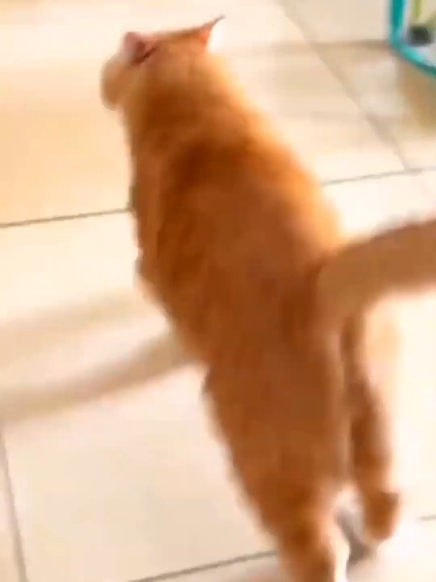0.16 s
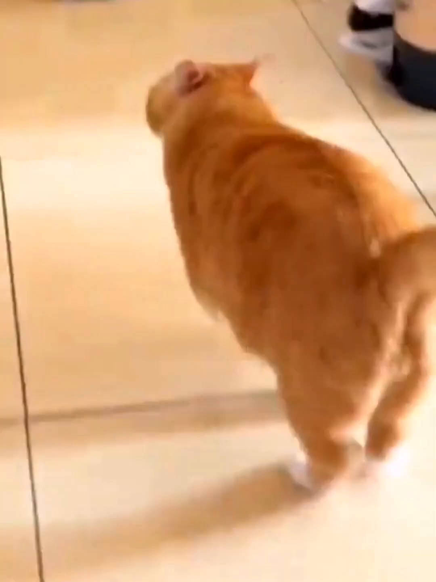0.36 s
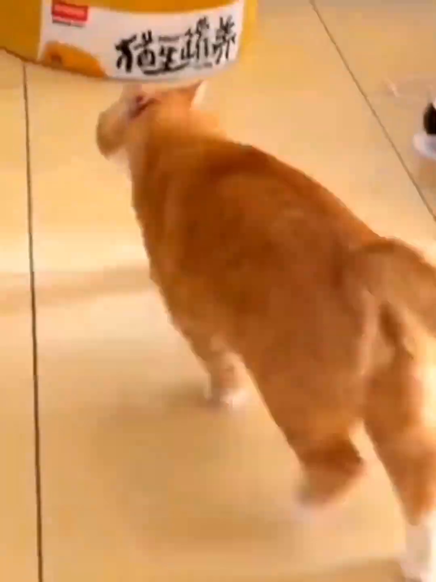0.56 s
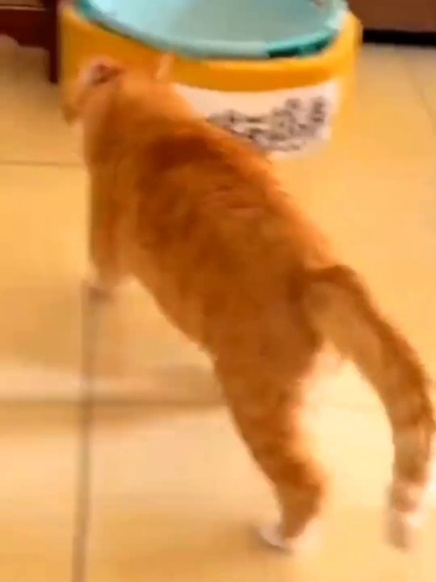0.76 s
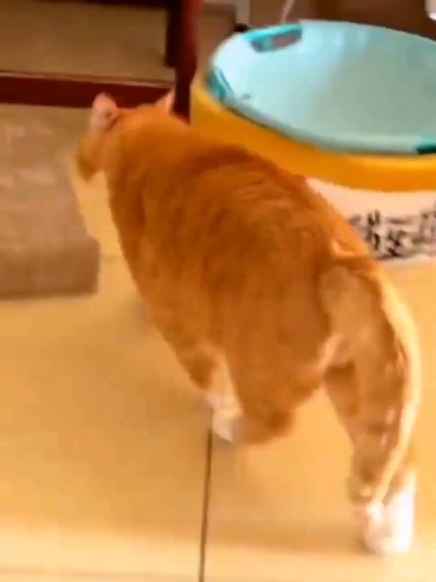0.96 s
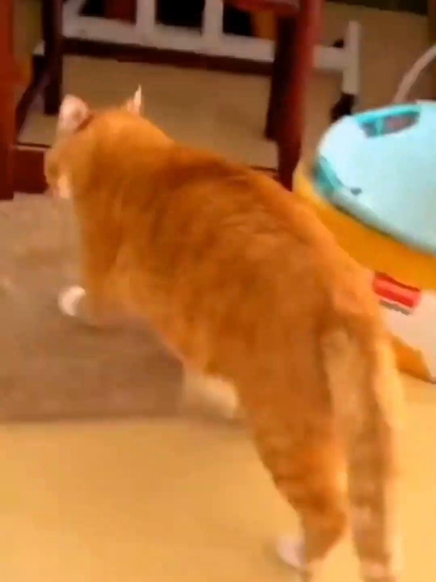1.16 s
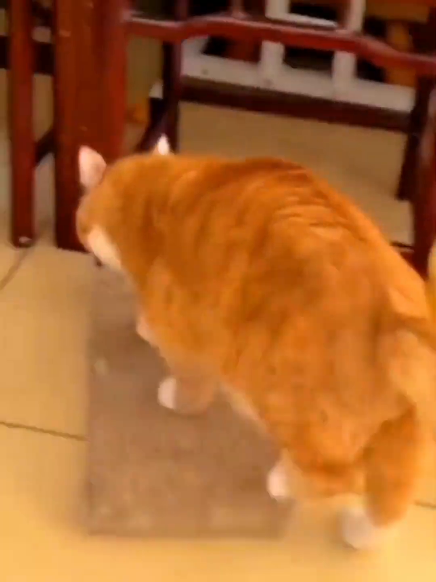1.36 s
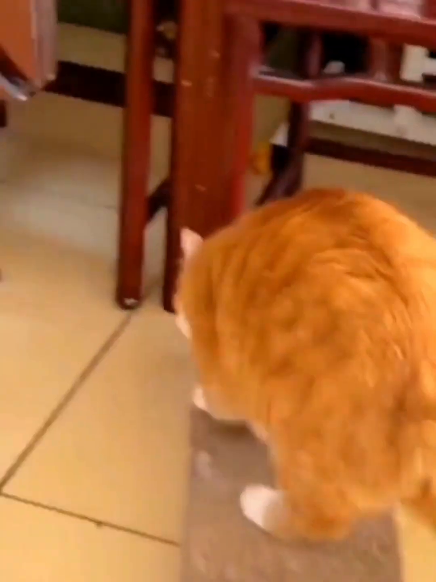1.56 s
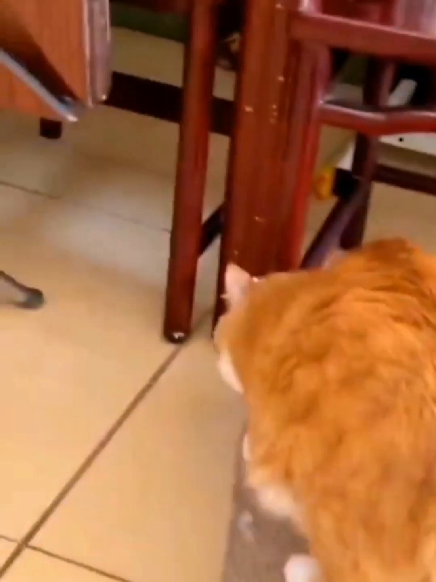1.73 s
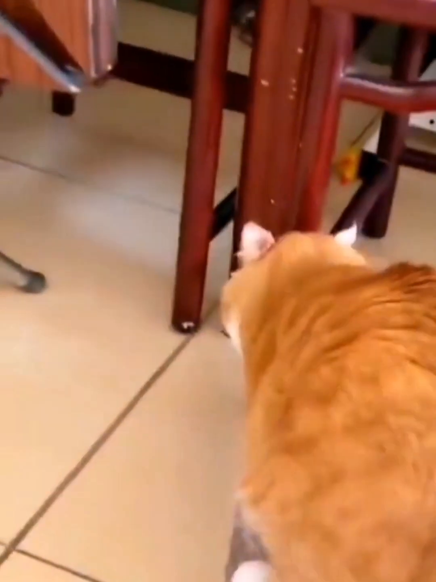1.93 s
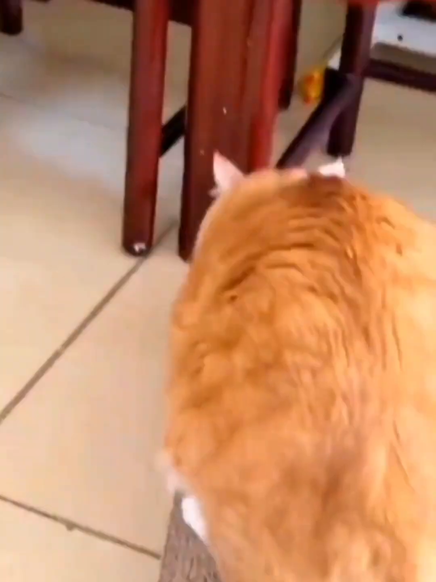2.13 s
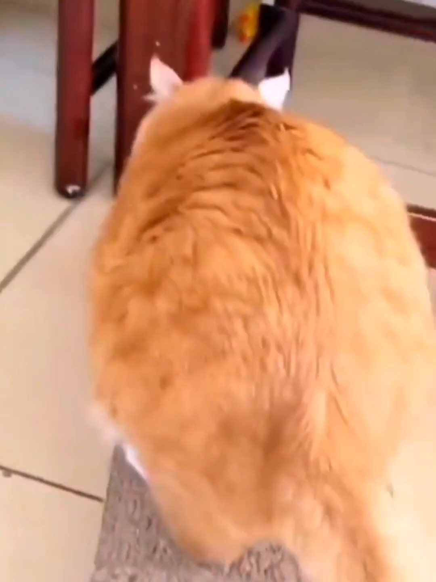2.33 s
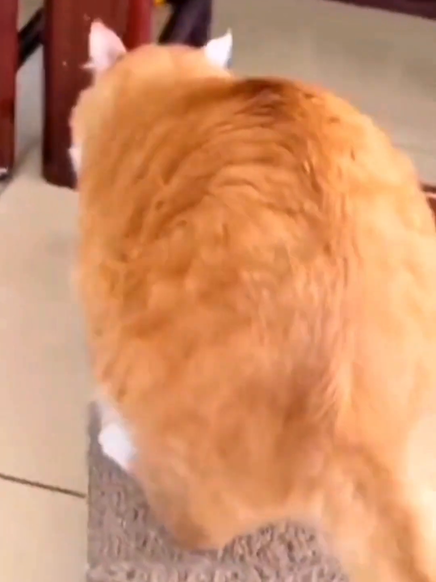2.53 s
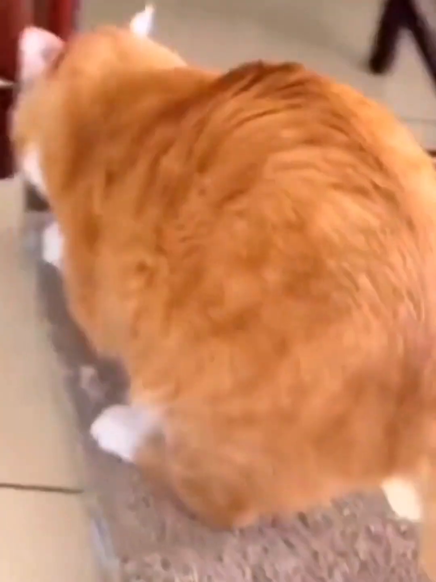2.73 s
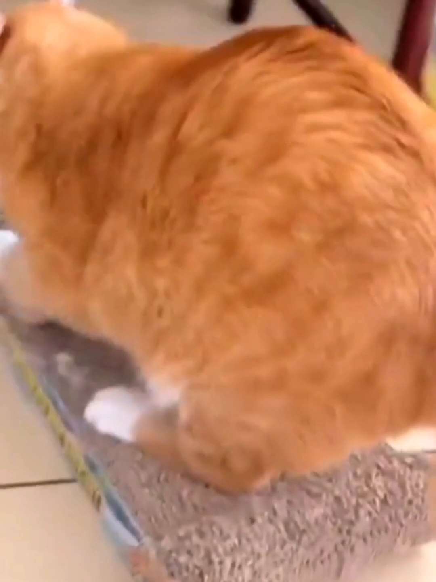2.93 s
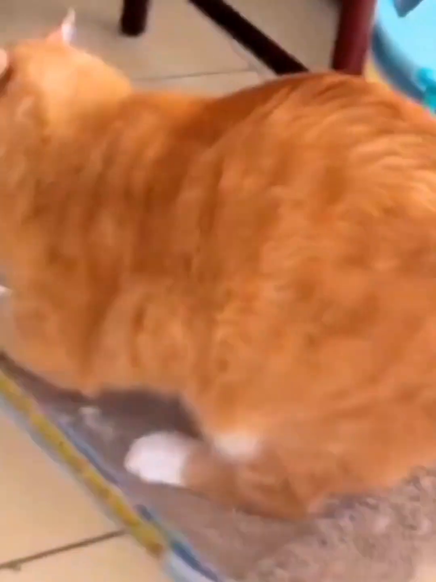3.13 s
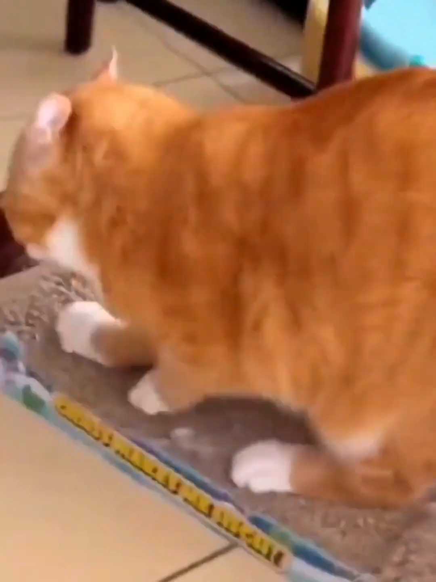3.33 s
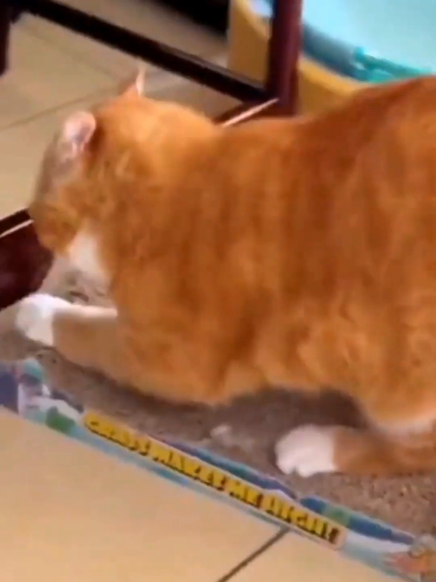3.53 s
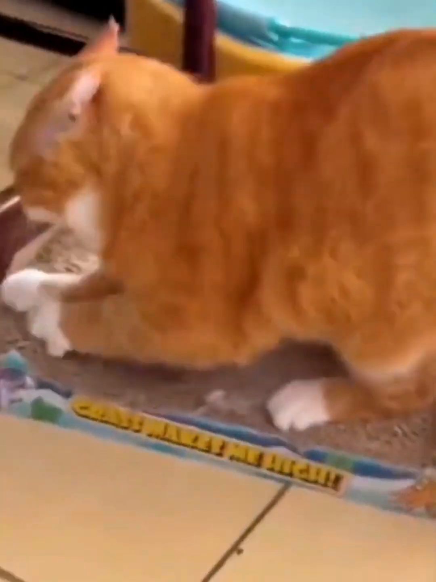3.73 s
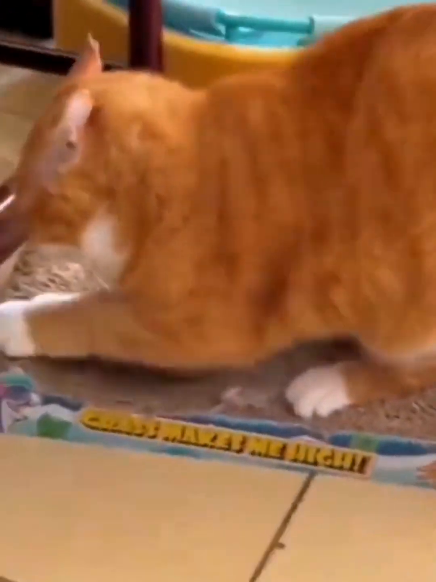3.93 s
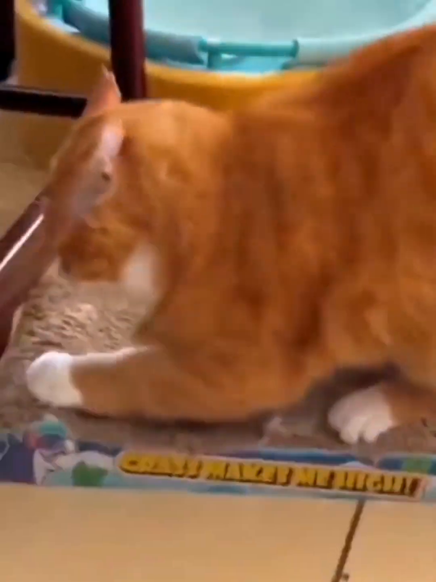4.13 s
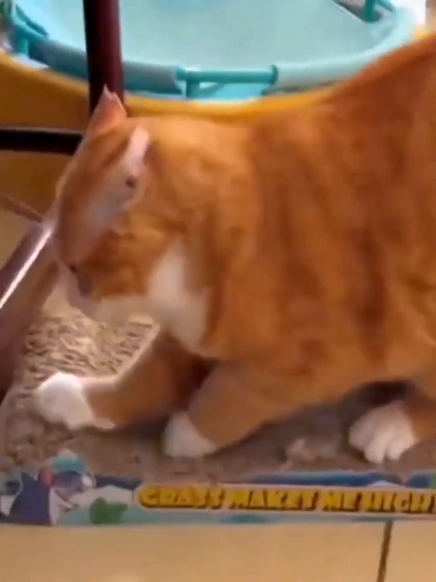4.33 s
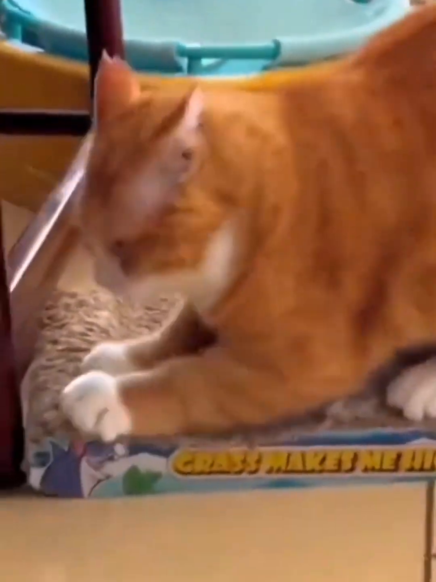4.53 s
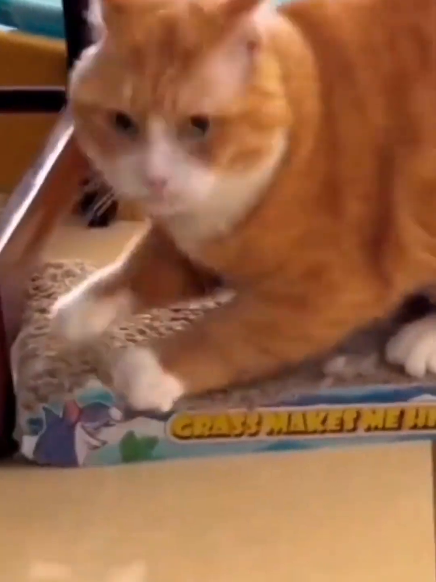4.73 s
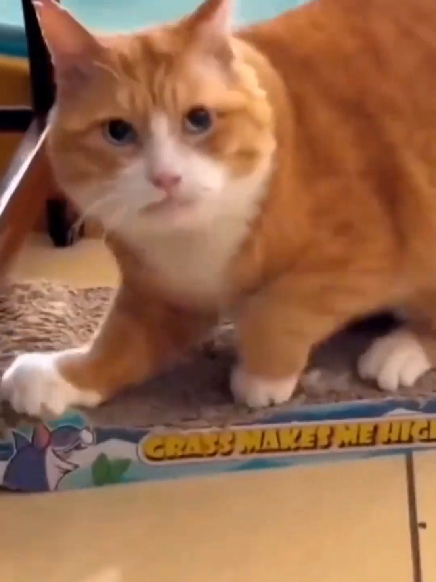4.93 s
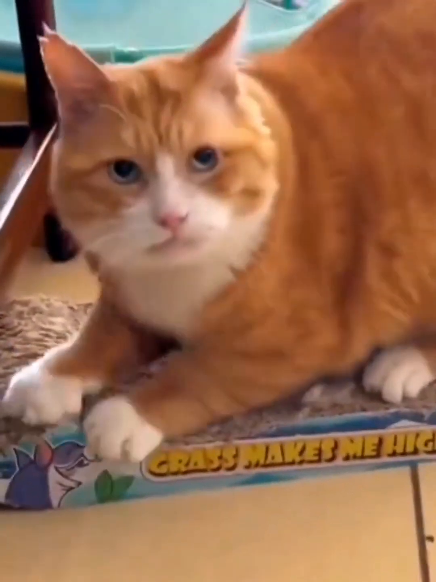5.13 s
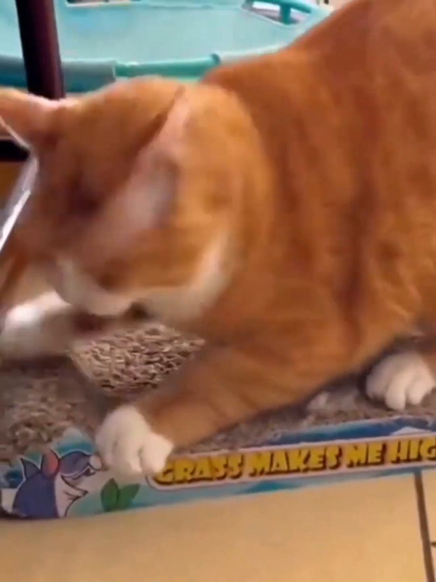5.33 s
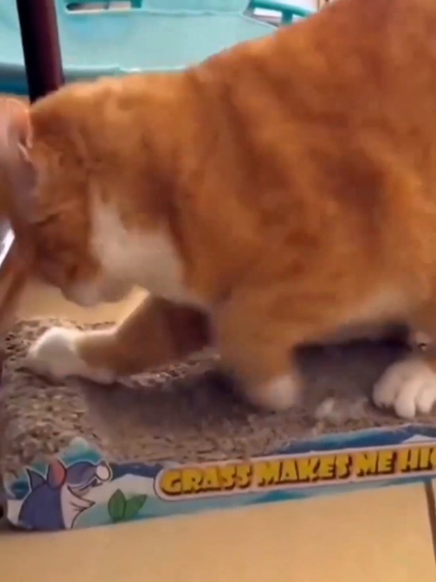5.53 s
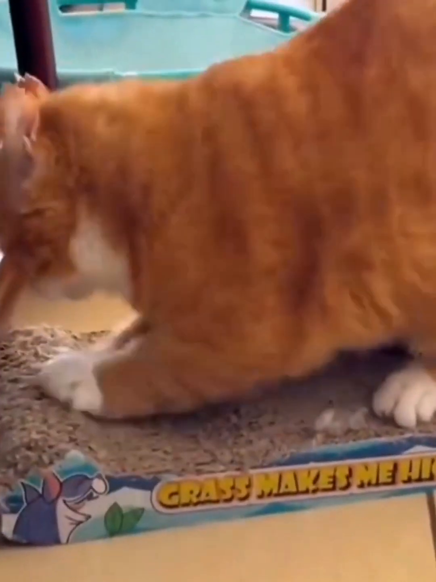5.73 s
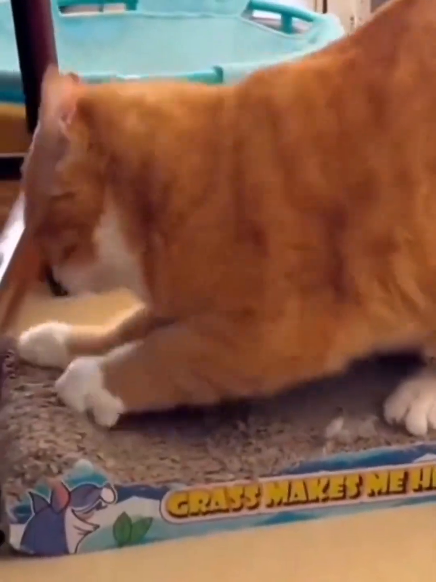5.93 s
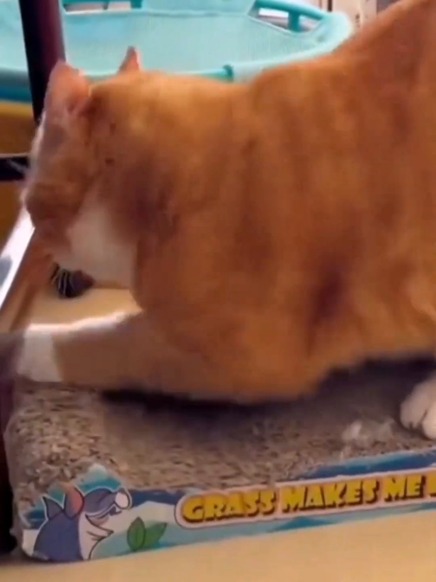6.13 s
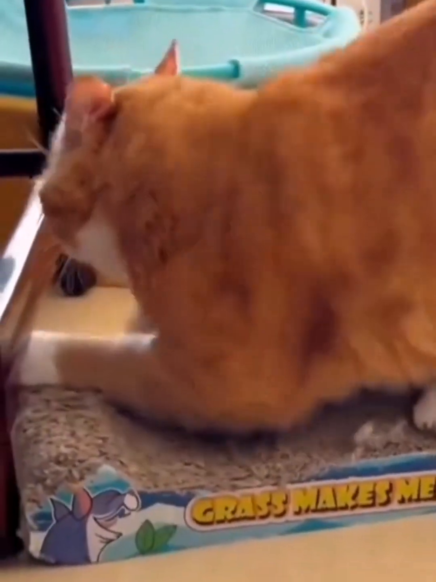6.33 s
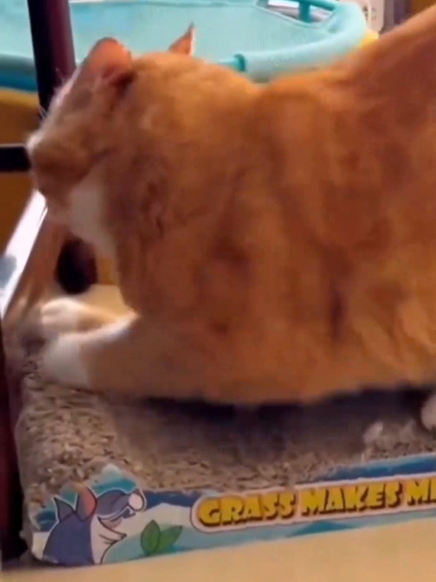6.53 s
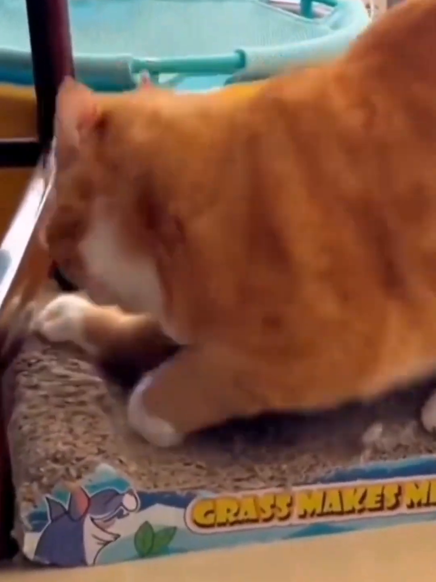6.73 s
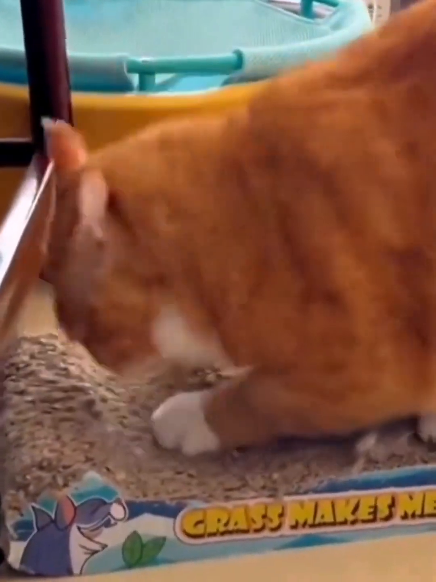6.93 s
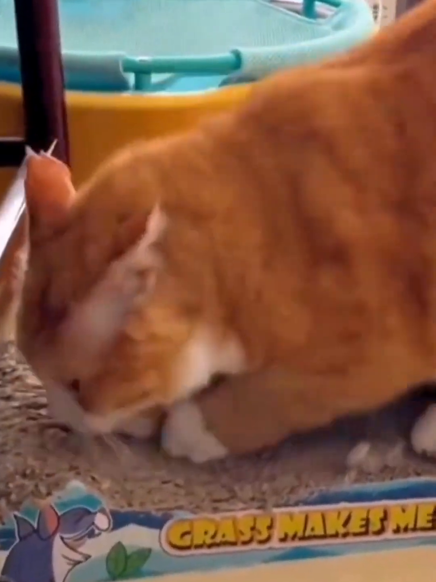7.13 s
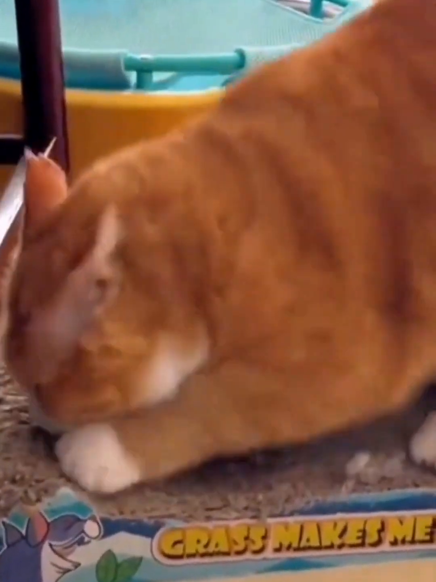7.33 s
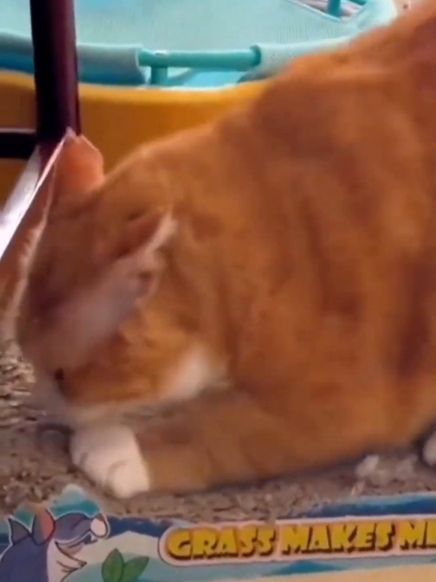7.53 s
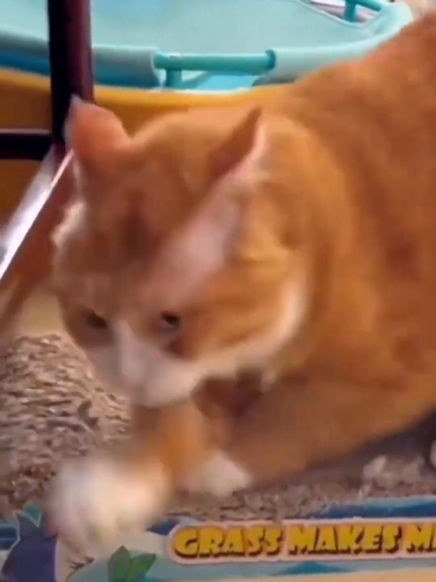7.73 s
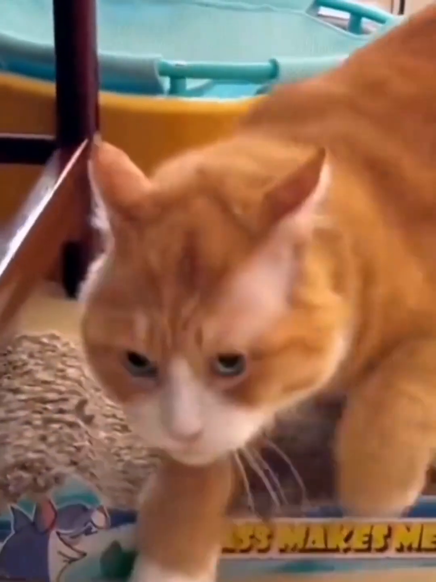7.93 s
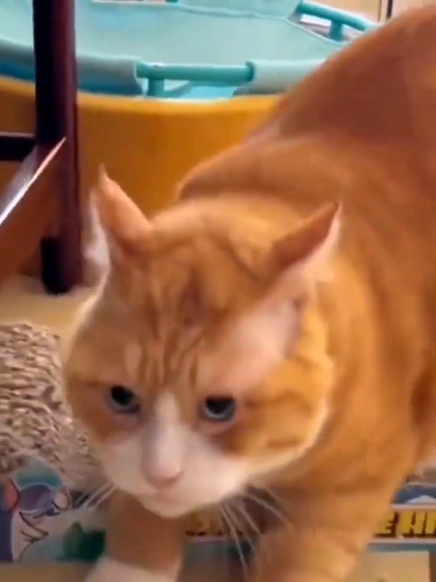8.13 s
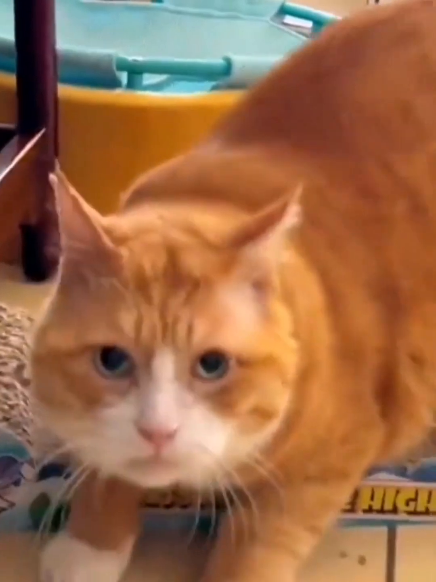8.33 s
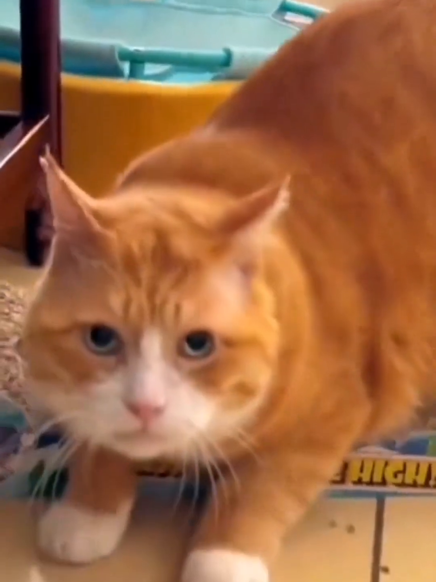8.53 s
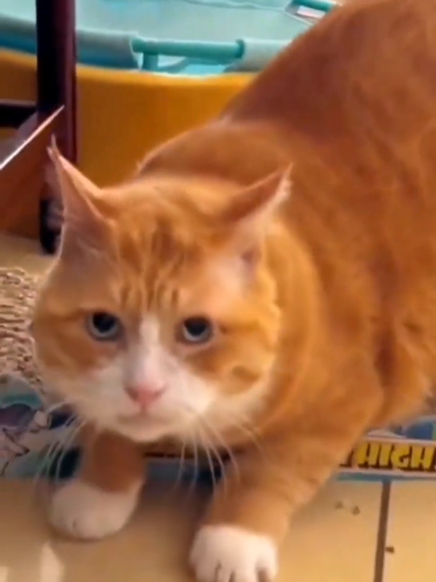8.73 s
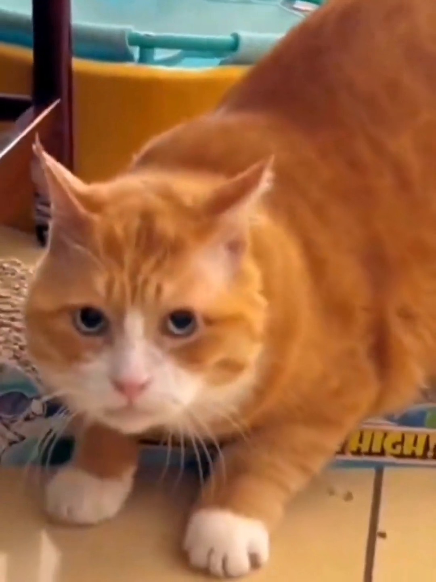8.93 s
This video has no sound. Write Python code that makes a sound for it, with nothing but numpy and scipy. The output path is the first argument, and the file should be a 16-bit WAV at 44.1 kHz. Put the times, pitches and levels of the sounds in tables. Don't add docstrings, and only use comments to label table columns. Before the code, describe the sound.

Soft footfalls and hand rumble, then bursts of hollow papery clawing and gritty scraping on a cardboard scratcher in a small hard room.

```python
import sys
import numpy as np
from scipy import signal
from scipy.fft import rfft, irfft
from scipy.io import wavfile
from scipy.ndimage import uniform_filter1d

SR = 44100
rng = np.random.default_rng(int(sys.argv[2]) if len(sys.argv) > 2 else 0)


def to_linear_factor(level_db):
    exponent = np.asarray(level_db, float) / 20
    return 10 ** exponent


def log_audio(samples):
    frames = np.atleast_2d(samples).T
    limited = np.clip(frames, -1, 1)
    pcm = np.round(limited * 32767).astype(np.int16)
    wavfile.write(sys.argv[1], SR, pcm)


N = 395577


def evened(x):
    return x / np.sqrt(np.mean(x ** 2) + 1e-20)


def crest(x):
    return np.sqrt(uniform_filter1d(x ** 2, 220).max() + 1e-20)


def read(points, hz):
    f, value = np.transpose(points)
    return np.interp(np.log(hz + 1), np.log(f + 1), value)


def controls(rows):
    s, *columns = np.transpose(rows)
    return [np.interp(np.arange(N) / SR, s, column) for column in columns]


def coloured(x, points):
    gain_db = np.maximum(read(points, abs(np.fft.fftfreq(8192, 1 / SR))), -90)
    log_gain = np.log(to_linear_factor(gain_db))
    taps = np.fft.ifft(np.exp(np.conj(signal.hilbert(log_gain)))).real[:2048]
    return signal.oaconvolve(x, taps / np.linalg.norm(taps))[:len(x)]


def band(x, lo_hz, hi_hz, order=2):
    sos = signal.butter(order, [lo_hz, min(hi_hz, SR / 2.2)], "band", fs=SR, output="sos")
    return signal.sosfilt(sos, x)


def crackle(per_s, spread_db):
    size = to_linear_factor(spread_db * np.minimum(rng.exponential(1, N), 4)) * rng.choice([-1., 1.], N)
    return evened(size * (rng.random(N) < per_s / SR))


def lumps(per_s, depth_db):
    span = max(int(SR / per_s), 1)
    chance = uniform_filter1d(uniform_filter1d(rng.standard_normal(N), span), span)
    return evened(to_linear_factor(depth_db * evened(chance)))


def patchy(x, depth_db=3.5, size=256, count=5):
    hz, t, z = signal.stft(x, SR, nperseg=size)
    clumps = uniform_filter1d(rng.standard_normal(z.shape), size=count, axis=0)
    clumps = evened(uniform_filter1d(clumps, size=2304 // size, axis=1))
    return evened(signal.istft(z * to_linear_factor(depth_db * clumps), SR, nperseg=size)[1][:N])


def blows(rows, width, body_share, slips, body, tick):
    out = np.zeros(N)
    ring_share, ring_width, tick_hurry = 1.3, 1.07, 1.7
    uppers = np.resize(rng.uniform(1.38, 2.71, size=128), len(rows))
    for (s, db, hz, tick_db, t60, rise), upper in zip(np.array(rows, float), uppers):
        t60, rise = np.clip(t60, .008, .4), max(rise, .0004)
        lead = 3 * rise + 0.0031
        at = max(round((s - lead) * SR), 0)
        t = np.arange(min(int((t60 + lead + .01) * SR), N - at)) / SR - lead + 0.001493
        part = slice(at, at + len(t))
        shape = to_linear_factor(np.where(t < 0, 10 * t / rise, -60 * t / t60))
        snap = (t >= 0) * (t < 1 / SR) * 0.079 / (rise + 0.0041)
        push = slips[part] * shape + snap

        patch = band(push, hz / width, hz * width)
        patch += 0.5 * band(push, hz * upper / 1.06, hz * upper * 1.042)
        ring = band(patch, hz / ring_width, hz * ring_width, order=1)
        thump = patch / crest(patch) + ring_share * ring / crest(ring)
        thump += body_share * body[part] * shape

        sharp = tick[part] * np.roll(shape, -30) ** np.where(t < 0, 1, tick_hurry)
        sharp *= to_linear_factor(tick_db - 4) / crest(sharp)
        out[part] += to_linear_factor(db) * (thump / crest(thump) + sharp)
    return out


def through_board(x):
    # (frequency [Hz], gain [dB])
    board_gain = [(150, -30.5), (250, 1.5), (545, 8.5), (678, -0.5), (1090, 2.5), (1960, -0.5),
                  (2820, -9.5), (3000, -7), (3900, -11.5), (6600, -120)]
    return evened(coloured(x, board_gain) + 7.5 * band(x, 584, 609, order=1))


def claw_tips():
    # (frequency [Hz], gain [dB])
    tip_gain = [(880, -18.5), (1500, -4), (2860, -14), (4130, -10.5), (8290, -21.5), (9000, -23),
                (11700, -72), (19800, -120)]
    return evened(coloured(crackle(9000, 0.63), tip_gain))


def claw_snags(slips, tip):
    # (peak time [s], level [dB], board pitch [Hz], tick over thump [dB])
    snaps = [(1.667, -12.5, 800, -2), (1.851, -8.5, 910, -8), (2.568, -20, 630, -4),
             (2.693, -10, 690, -1.5), (2.953, -12, 980, -5.5), (3.037, -6, 490, -22), (3.525, -10, 650, -5),
             (3.694, -6.5, 650, -22), (3.923, -21, 910, 12), (3.927, -12.5, 600, -29),
             (4.471, -6, 580, -32), (4.956, -23, 760, -16), (5.498, -9, 770, -35), (5.655, -11.5, 724, -27),
             (5.689, -23, 830, -3), (5.732, -9.5, 775, -10), (5.797, -12, 685, -2), (5.853, -6, 710, -4.5),
             (6.268, -10.5, 896, -30), (6.354, -8.5, 395, -11.5), (6.37, -15, 510, -23),
             (6.55, -15, 520, -28), (6.69, -8.5, 650, -12), (6.749, -12.5, 513, -18),
             (6.795, -21, 647, -26), (6.904, -10, 1190, -13), (7.047, -6.5, 856, -8),
             (7.393, -7.5, 626, -28), (7.569, -6.5, 933, -8.5)]
    snap_t60_s, snap_rise_s = 0.036, 0.0012
    # (peak time [s], level [dB], board pitch [Hz], tick over thump [dB])
    catches = [(1.512, -23.5, 490, -10), (1.637, -15, 380, -11), (2.137, -14, 600, -21),
               (2.277, -17, 740, -12), (2.586, -10.5, 690, -10), (2.605, -12.5, 686, -10),
               (3.366, -16.5, 730, -32), (3.545, -12.5, 766, 0), (3.567, -12, 670, 0),
               (3.59, -13.5, 604, 0), (3.613, -13.5, 630, -8), (3.948, -24.5, 770, 9.5),
               (4.12, -14.5, 660, 3), (4.341, -20, 650, -4), (4.666, -8, 607, -22), (4.98, -14, 530, -30),
               (5.04, -12, 502, -13), (5.072, -12.5, 574, -0.5), (5.562, -15.5, 705, -35),
               (5.6, -15, 720, -21), (5.882, -9, 596, -36), (6.135, -14.5, 660, -29),
               (6.165, -21, 740, -27), (6.468, -19.5, 660, -8), (6.503, -14.5, 734, -10),
               (6.612, -16.5, 320, -34), (6.704, -22, 614, -32), (6.724, -13, 477, -31),
               (6.998, -9.5, 810, -8)]
    catch_t60_s, catch_rise_s = 0.049, 0.0064
    # (peak time [s], level [dB], board pitch [Hz], tick over thump [dB], t60 [s])
    rips = [(1.473, -21.5, 483, -24, 0.47), (1.9, -28, 615, 2, 0.28), (2.261, -17, 810, -11, 0.069),
            (2.289, -9, 712, -14, 0.19), (2.318, -28.5, 780, 12, 0.22), (2.45, -15.5, 670, -13, 0.097),
            (2.711, -11.5, 960, -3, 0.094), (2.808, -20, 540, 1.5, 0.18), (3.267, -19, 684, -5, 0.13),
            (3.711, -22, 650, -6, 0.79), (4.508, -12.5, 617, -27, 0.17), (4.642, -8.5, 710, -9, 0.044),
            (5.291, -6, 714, -17, 0.11), (5.366, -21, 576, -25, 0.28), (6.438, -6.5, 478, -17, .19),
            (6.775, -16, 670, -26, 0.19), (7.069, -10, 730, -35, 0.057), (7.13, -25, 596, -28, 0.17),
            (7.371, -8, 815, -24, 0.067), (7.592, -4, 560, -14, 0.12), (7.688, -15, 550, -8, 0.17),
            (7.768, -12, 640, -28, 0.024)]
    rip_rise_s, rip_hurry = 0.0056, 0.44
    # (peak time [s], level [dB], board pitch [Hz], tick over thump [dB], t60 [s])
    pulls = [(1.681, -8.5, 516, -27, 0.14), (1.868, -10, 720, -10, 0.2), (2.152, -11, 744, -13, 0.15),
             (2.364, -8.5, 690, -6.5, 0.083), (2.734, -9, 580, -10, 0.12), (3.11, -13.5, 647, 3, 0.25),
             (3.206, -13, 740, -3, 0.12), (3.465, -10, 720, -11, 0.12), (3.68, -8, 686, -6.5, 0.033),
             (3.978, -11, 660, -15, 0.053), (4.036, -11.5, 586, -1, 0.15), (4.139, -9.5, 686, -8, 0.14),
             (4.298, -19.5, 534, -29, 0.12), (4.572, -14.5, 780, -1, 0.025), (4.742, -12, 640, 0, 0.079),
             (5.629, -9, 670, -19, 0.17), (6.075, -24, 880, -25, 0.075), (7.476, -15, 577, -3, 0.17),
             (7.785, -13, 666, -10, 0.15), (2.868, -25.5, 800, -5, 0.037), (3.789, -29.5, 694, 8.5, 0.13),
             (3.862, -24, 634, 2, .07), (4.54, -28.5, 780, 7.5, 0.084), (7.163, -26.5, 620, -13, 0.071)]
    pull_rise_s = 0.021
    # (peak time [s], level [dB], board pitch [Hz], tick over thump [dB], t60 [s])
    afters = [(3.013, -23, 1180, 1, 0.044), (3.187, -14, 690, -16, .05), (3.199, -18, 760, -19, .04),
              (5.505, -17, 900, -32, 0.04), (5.611, -19, 720, -9, .04), (5.646, -16.5, 810, -23, 0.028),
              (5.739, -14.5, 550, -25, 0.052), (5.873, -20, 820, -27, 0.061), (6.132, -17, 640, -29, 0.027),
              (6.144, -31, 720, -28, 0.041), (6.161, -12, 710, -30, 0.021), (6.342, -16, 520, -14, 0.053),
              (6.449, -12, 465, -20, 0.025), (6.458, -25, 520, -20, 0.029), (6.702, -11, 697, -52, 0.031),
              (6.896, -29, 1080, -11, .04), (6.979, -21, 900, -7, 0.066), (6.988, -12, 574, -18, 0.041),
              (7.006, -20, 770, -20, 0.015), (7.059, -12, 920, -23, 0.032), (7.081, -20, 1000, -24, 0.033),
              (7.143, -35, 3330, -13, 0.037), (1.251, -32.5, 970, -17, .04), (5.28, -15, 820, -6, 0.051),
              (5.304, -12, 930, -26, 0.038), (2.251, -16.5, 700, -16, 0.043), (2.144, -18, 650, -30, 0.12),
              (1.626, -19, 340, -27, 0.065), (1.862, -15.5, 654, -21, 0.071), (4.654, -20, 820, -12, .04),
              (4.729, -22, 770, -9, 0.045), (6.137, -13, 623, -33, 0.022), (6.738, -17, 600, -21, 0.044),
              (8.016, -35, 600, -25, .04), (7.1, -31, 596, -30, 0.32), (1.92, -29, 603, -30, 0.23)]
    after_rise_s = 0.00089

    rows = [(*row, snap_t60_s, snap_rise_s) for row in snaps]
    rows += [(*row, catch_t60_s, catch_rise_s) for row in catches]
    rows += [(*row, rip_rise_s * to_linear_factor(-rip_hurry * row[1])) for row in rips]
    rows += [(*row, pull_rise_s) for row in pulls]
    rows += [(*row, after_rise_s) for row in afters]
    return blows(rows, 1.68, 0.85, slips, through_board(slips), tip)


def settling_ticks(slips, tip):
    # (peak time [s], level [dB], pitch [Hz], tick over thump [dB])
    settlings = [(0.062, -33, 1340, -24), (1.53, -27, 1600, 4), (2.534, -25, 1840, -6),
                 (3.023, -19, 870, 9.5), (3.191, -21, 860, 3), (7.759, -17, 1160, 0),
                 (7.967, -30, 1210, -23), (8.014, -26.5, 1710, -28), (8.361, -37.5, 2370, -1),
                 (6.315, -22, 694, -13), (6.038, -36, 2430, 5.5)]
    t60_s, rise_s = .055, .0013
    rows = [(*row, t60_s, rise_s) for row in settlings]
    return blows(rows, 1.48, .05, slips, tip, tip)


def paw_drag(snags):
    # (time [s], resting drag [dB], crispness [dB])
    resting = [(0.0, -31.5, 2), (.13, -38.5, 1.5), (.86, -37.5, -2.5), (1.35, -38, -4), (1.6, -30.5, 1),
               (2.04, -29.5, -8), (2.2, -26.5, -13), (3.1, -33.5, 7), (3.4, -33.5, -2), (4.3, -29.5, -3),
               (5.05, -38, 6.5), (5.26, -30.5, 3.5), (5.33, -33, 2.5), (5.5, -39.5, -4.5),
               (6.85, -33.5, -7), (7.8, -35.5, -5.5), (7.95, -46, 7), (8.18, -55.5, 19), (8.24, -63, 9.5)]
    stroke_s, stroke_lag_s, stroke_db = 0.021, 0.003, -13
    rest_db, crisp_db = controls(resting)
    keep = np.exp(-1 / (stroke_s * SR))
    stroke = abs(signal.lfilter([1 - keep], [1, -keep], uniform_filter1d(snags ** 2, 700)))
    stroke = np.roll(stroke, int(stroke_lag_s * SR))
    return 10 * np.log10(to_linear_factor(2 * rest_db) + to_linear_factor(2 * stroke_db) * stroke), crisp_db


def claws():
    # (frequency [Hz], gain [dB])
    grit_gain = [(1290, -22), (2200, 6), (2670, 1.5), (4030, 3.5), (5940, 2.5), (8000, -2), (10400, -52),
                 (17600, -120)]
    slips, tears, tip = crackle(1400, 2.78), crackle(1200, 1.17), claw_tips()
    snags = claw_snags(slips, tip)
    drag_db, crisp_db = paw_drag(snags)
    grit_db = -3.5 + 0.95 * crisp_db
    dust_db = -12.5 + 1.07 * crisp_db

    pressure = lumps(33.5, 2.57)
    drag = to_linear_factor(drag_db) * pressure * patchy(through_board(tears), depth_db=5.0, size=768, count=3)
    load = np.sqrt(uniform_filter1d(snags ** 2, 350) + to_linear_factor(drag_db) ** 2) / to_linear_factor(drag_db)
    tearing = pressure ** 0.6 * load ** 0.4
    grit = patchy(coloured(crackle(12000, 2.3), grit_gain))
    scrape = to_linear_factor(drag_db + grit_db - 3.0) * tearing * grit
    knocks = evened(band(tears, 128.5, 331)) + 0.36 * evened(band(tears, 81, 147))
    pad = to_linear_factor(drag_db - 15.5) * load ** 0.9 * knocks
    paws = snags + settling_ticks(slips, tip) + drag + scrape + pad
    return paws, drag_db + dust_db + 7.5, tearing


def dust(level_db, tearing):
    fibre_gain = [(7300, -58), (8000, 2.0), (10000, 4.5), (13000, 1.5), (13600, -43)]  # (Hz, dB)
    a, b = (evened(coloured(crackle(14000, 5.9), fibre_gain)) for _ in range(2))
    ports = np.array([a, 0.58 * np.roll(a, 48) + 0.95 * b])
    return to_linear_factor(level_db - 5.5) * tearing ** 1.47 * ports


def footfalls():
    # (peak time [s], level [dB], pitch [Hz], tick over thump [dB], rise [s])
    landings = [(0.229, -27.5, 714, 8, 0.0012), (0.287, -18.5, 258, -3, 0.023),
                (0.349, -13, 324, -5, 0.0042), (0.38, -22.5, 231, -5.5, 0.042),
                (0.716, -15, 402, -4, 0.0081), (0.919, -25, 374, -0.5, .011),
                (0.989, -27.5, 235, 0.5, 0.049), (1.063, -18.5, 494, -8, 0.017),
                (1.089, -19, 490, -2, 0.0048), (1.341, -25.5, 744, -14, 0.0062),
                (.648, -31.5, 414, 2, 0.013)]
    t60_s, t60_per_rise = 0.056, 6
    slips = crackle(1500, 3.3)
    rows = [(*row, t60_s + t60_per_rise * rise, rise) for *row, rise in landings]
    body, sole = evened(band(slips, 120, 1030)), evened(band(slips, 380, 2600))
    return blows(rows, 2.04, 0.78, slips, body, sole)


def hand():
    # (time [s], rumble level [dB])
    unrest = [(0.0, -42), (.35, -22), (.49, -38), (.72, -27.5), (.86, -41), (1.08, -22), (1.22, -39),
              (2.95, -37.5), (3.05, -31.5), (3.5, -33), (4.65, -38.5), (4.85, -48), (6.46, -43),
              (7.55, -48.5), (8.95, -51.5)]
    walk_apart, still_apart, walk_end_s = 0.4, 0.079, 1.4
    rumble_db, = controls(unrest)
    shuffle_db = -36.5 + 0.96 * (rumble_db - rumble_db.mean())
    a, b, c, d = rng.standard_normal((4, N))
    apart = np.where(np.arange(N) < walk_end_s * SR, walk_apart, still_apart)
    low = np.array([a + apart * b, a - apart * b])
    rumble = to_linear_factor(rumble_db) * lumps(23, 2.9) * evened(band(low, 43.0, 94))
    rub = np.array([c + 1.8 * apart * d, c - 0.65 * apart * d])
    shuffle = to_linear_factor(shuffle_db - 1.0) * lumps(26, 4.7) * evened(band(rub, 118, 288))
    return rumble + shuffle


def bumps():
    # (time [s], level [dB], frequency [Hz], length [s])
    pushes = [(0.318, -19, 53.4, 0.031), (0.734, -27, 64, 0.11), (1.082, -30, 56.4, 0.038),
              (1.492, -26, 85, 0.018), (2.067, -28, 85, 0.053), (2.275, -28, 63, 0.044),
              (3.061, -17.5, 80, 0.012), (3.119, -25, 60.3, 0.042), (3.237, -25.5, 49, 0.13),
              (3.371, -26.5, 56.4, 0.091), (3.451, -28, 54, 0.053), (3.817, -16.5, 104, 0.019),
              (7.506, -36, 71.5, 0.031)]
    out = np.zeros((2, N))
    for (s, db, hz, length), lean in zip(pushes, rng.uniform(-0.2, 1, size=32)):
        t = np.arange(-2 * length, 2 * length, 1 / SR)
        swell = to_linear_factor(db + 5.0 - 30 * (t / np.maximum(length, 1.1 / hz)) ** 2)
        phase = .5 * lean * np.array([[-1], [1]])
        at = round((s - 2 * length) * SR)
        out[:, at:at + len(t)] += swell * np.cos(2 * np.pi * hz * t + phase)
    return out


def swish():
    # (time [s], level [dB])
    brush = [
        (8.88, -66),
        (8.94, -22),
        (8.97, -18.5),
    ]
    # (frequency [Hz], gain [dB])
    fur_gain = [(160, -48), (280, -9), (553, 5.5), (3140, -9), (4480, -6), (5720, -7), (8570, 0),
                (13500, -20)]
    level_db = np.where(np.arange(N) < brush[0][0] * SR, -120, controls(brush)[0])
    a, b = (coloured(rng.standard_normal(N), fur_gain) for _ in range(2))
    return to_linear_factor(level_db) * np.array([a + 0.12 * b, a - 0.16 * b])


def tiles(x):
    # (frequency [Hz], t60 [s])
    decay = [(300, 0.42), (2000, 0.24), (8000, 0.52)]
    # (frequency [Hz], gain [dB])
    port_gain = [(250, -17.5), (700, -4), (2500, -1.5), (6000, 1.5)]
    taps = np.zeros((2, SR // 2))
    jitter = rng.integers(0, 20, (2, (SR // 2 - 201) // 20))
    at = np.arange(200, SR // 2 - 20, 20) + jitter
    np.put_along_axis(taps, at, rng.choice([-1., 1.], at.shape), 1)
    hz, t, z = signal.stft(taps, SR, nperseg=256)
    tail = signal.istft(z * to_linear_factor(-60 * t / read(decay, hz)[:, None]), SR, nperseg=256)[1]
    size = tail.shape[1]
    apart = irfft(rfft(tail[1]) * to_linear_factor(read(port_gain, np.fft.rfftfreq(size, 1 / SR))), size)
    tail = np.array([tail[0] + apart, tail[0] - apart])
    return signal.fftconvolve(x[None], tail / np.linalg.norm(tail[0]), axes=1)[:, :N]


def room_tone():
    # (frequency [Hz], gain [dB])
    tone_gain = [(18, -51), (30, -19), (60, -2.5), (111, -10.5), (148, 5.5), (172, -30), (241, -19),
                 (446, -22), (5410, -36), (12300, -42.5), (14000, -42.5)]
    tone_db = -37.5
    # (time [s], level [dB])
    drift = [
        (0.0, 6),
        (7.9, -9),
        (8.22, -1.5),
        (8.3, -5),
        (8.4, 1),
        (8.58, 2),
        (8.66, -2),
        (8.86, -2.5),
        (8.97, 11),
    ]
    a, b = (evened(coloured(rng.standard_normal(N), tone_gain)) for _ in range(2))
    hiss = band(a, 410, 9000)
    wandering = to_linear_factor(controls(drift)[0]) * np.std(hiss) * patchy(hiss, depth_db=-1.5)
    a = a - hiss + wandering
    return to_linear_factor(tone_db - 4.0) * np.array([a + 0.17 * b, a - 0.18 * b])


def scene():
    paws, dust_db, tearing = claws()
    feet = footfalls()
    echoes = to_linear_factor(-5.0) * tiles(paws + 2.0 * feet)
    at_phone = hand() + bumps() + swish()
    return paws + feet + echoes + dust(dust_db, tearing) + at_phone + room_tone()


def thinned_treble(x):
    # (frequency [Hz], share of tiles dropped [0-1, above 1 always])
    dropped = [(2500, 0), (6300, .04), (7200, .2), (8000, .66), (8600, .5), (11500, .55), (12700, .66),
               (13300, 1.1)]
    hz, t, z = signal.stft(x, SR, nperseg=1024)
    luck = rng.standard_normal((len(hz) // 12 + 1, len(t) // 5 + 2))
    luck = evened(luck + .4 * np.roll(luck, 1, 0) + .2 * np.roll(luck, 1, 1))
    luck = np.repeat(.5 + .5 * np.tanh(.85 * luck), 5, 1)
    luck = [np.roll(row, k) for k, row in zip(rng.integers(0, 4, len(luck)), luck)]
    luck = np.repeat(luck, 12, 0)[:len(hz), :len(t)]

    power = uniform_filter1d((abs(z) ** 2).mean(0), 5, axis=1)
    treble_db = 10 * np.log10(power[hz > 8000].sum(0) / power[hz < 3000].sum(0) + 1e-12)
    busy = np.clip((8.25 - t) / .1, .15, 1)
    busy = busy * np.clip(1 - .025 * (treble_db - np.median(treble_db)), .6, 1.2)
    share = read(dropped, hz)[:, None]
    kept = np.where(luck < np.where(share > 1, share, share * busy), .002, 1)
    return signal.istft(z * kept, SR, nperseg=1024)[1][:, :N]


def top_cut(x):
    return signal.sosfilt(signal.butter(12, 14210, fs=SR, output="sos"), x)


def record(dry):
    knee, ceiling = .5, .85
    over = np.maximum(abs(dry) - knee, 0)
    limited = dry - np.sign(dry) * (over - (ceiling - knee) * np.tanh(over / (ceiling - knee)))
    mix = thinned_treble(limited)
    return top_cut(mix)


dry = scene()
out = record(dry)
log_audio(out)
```